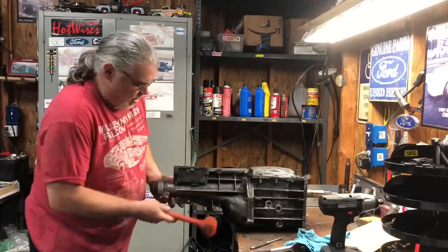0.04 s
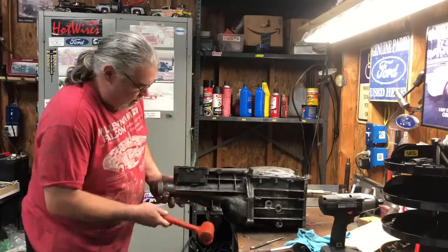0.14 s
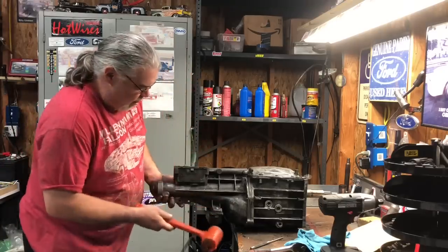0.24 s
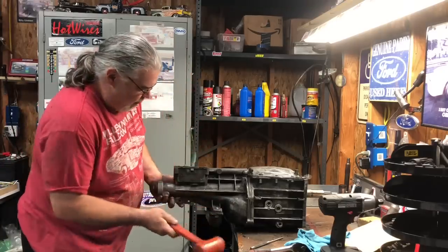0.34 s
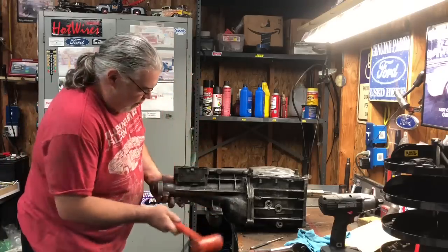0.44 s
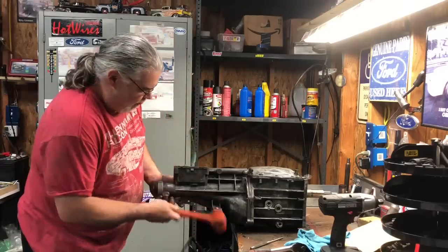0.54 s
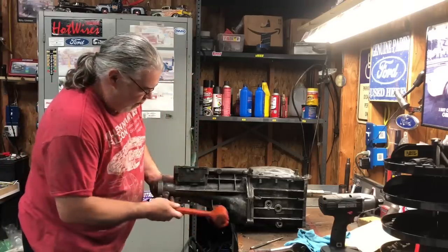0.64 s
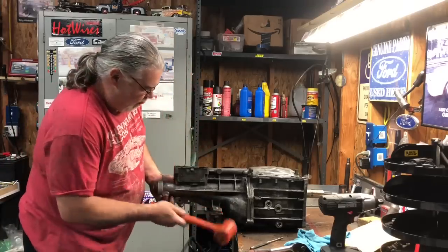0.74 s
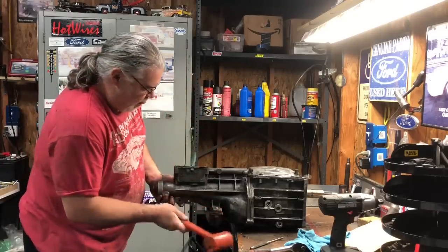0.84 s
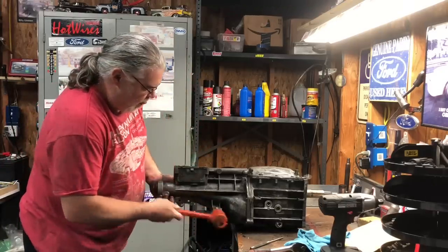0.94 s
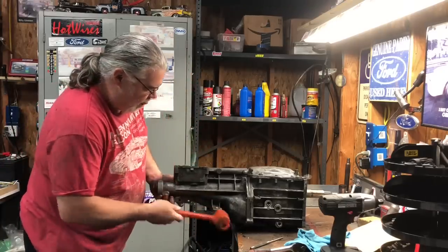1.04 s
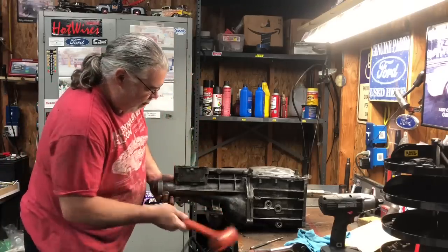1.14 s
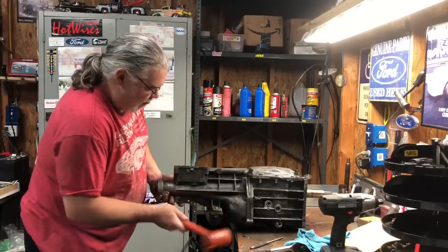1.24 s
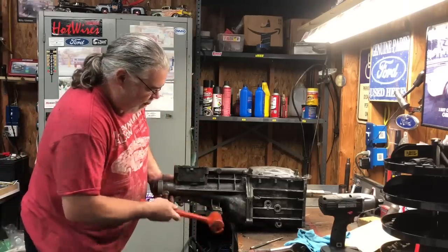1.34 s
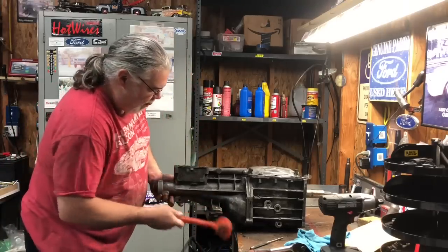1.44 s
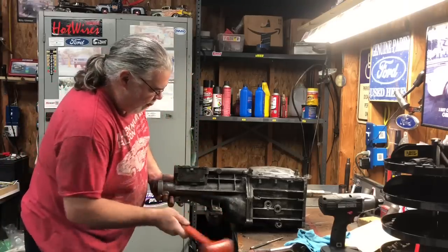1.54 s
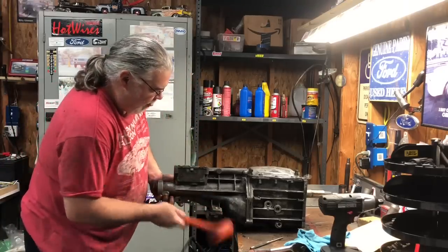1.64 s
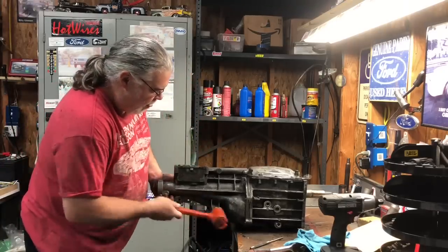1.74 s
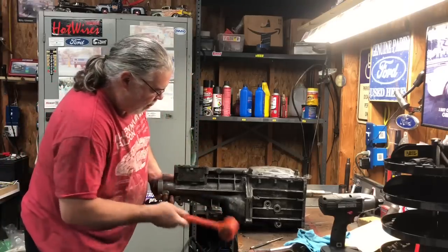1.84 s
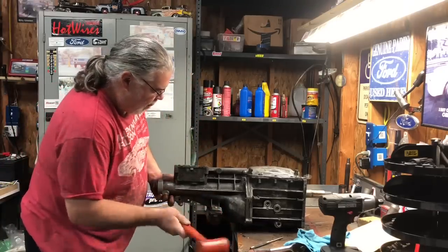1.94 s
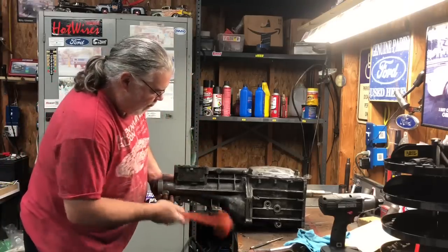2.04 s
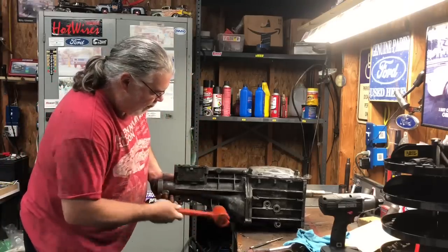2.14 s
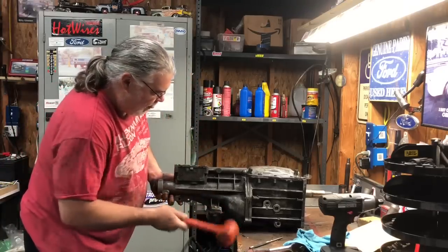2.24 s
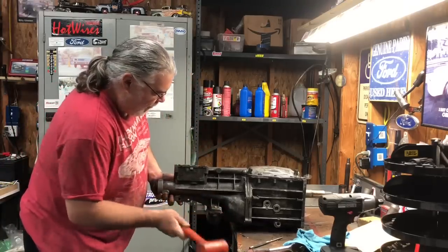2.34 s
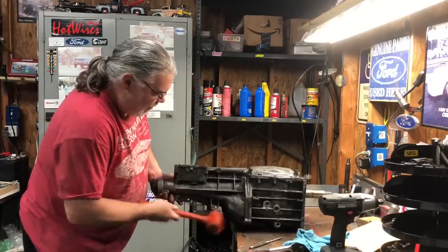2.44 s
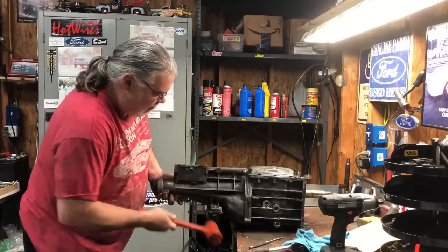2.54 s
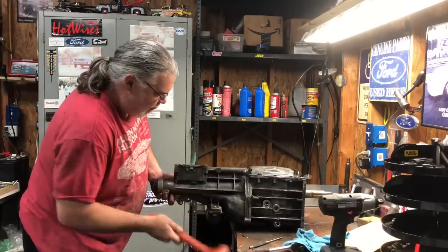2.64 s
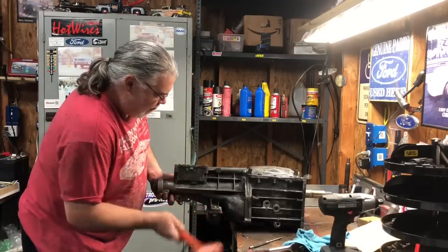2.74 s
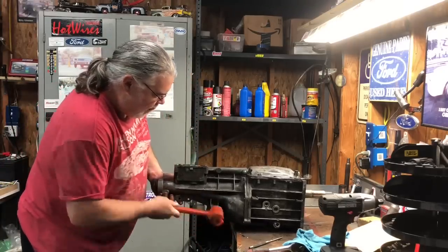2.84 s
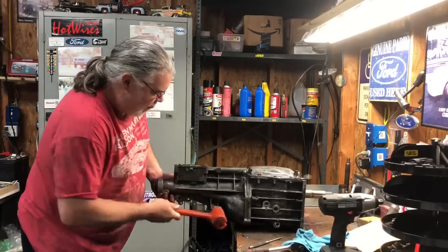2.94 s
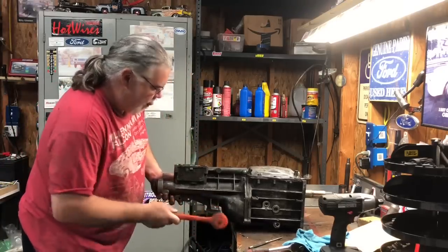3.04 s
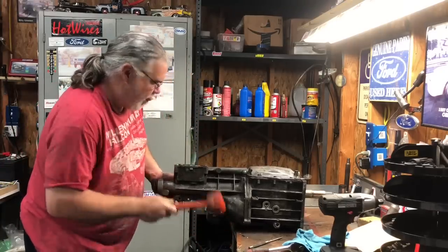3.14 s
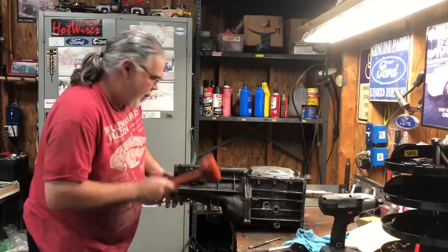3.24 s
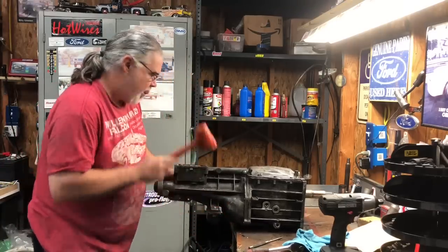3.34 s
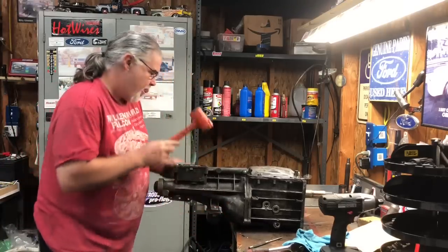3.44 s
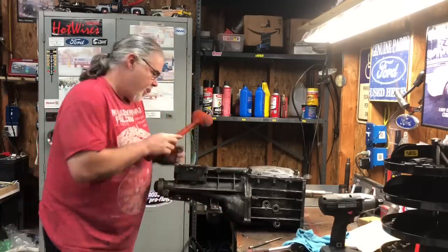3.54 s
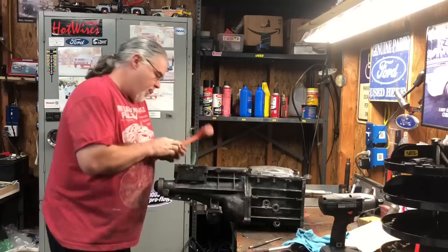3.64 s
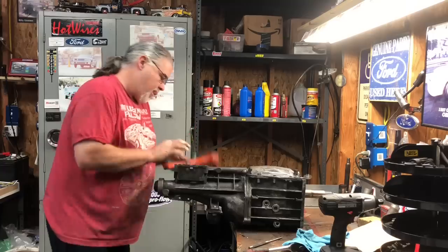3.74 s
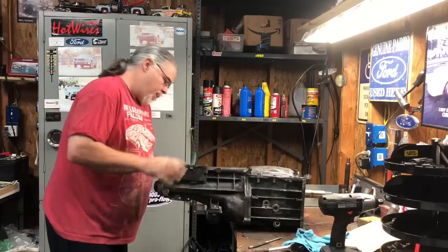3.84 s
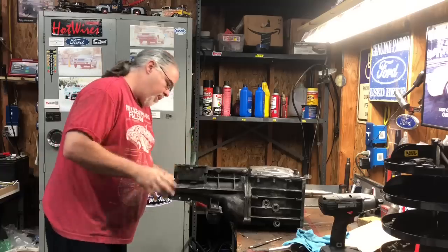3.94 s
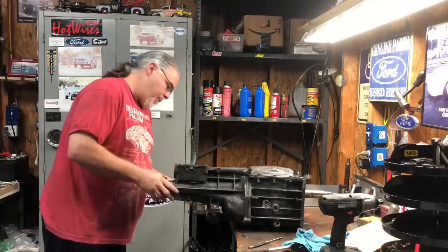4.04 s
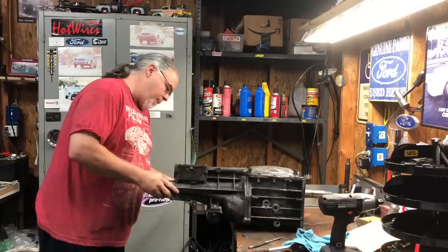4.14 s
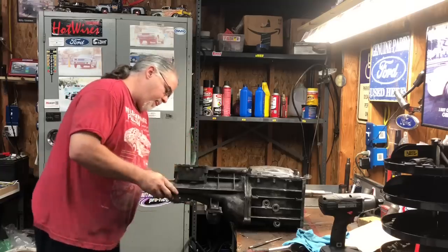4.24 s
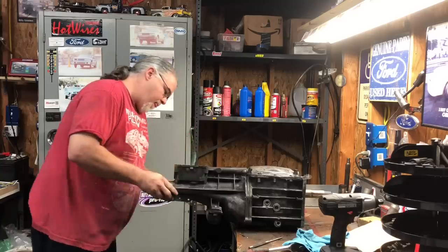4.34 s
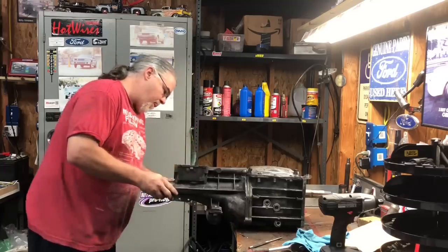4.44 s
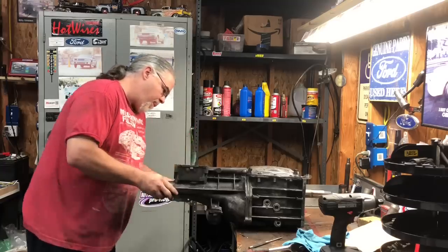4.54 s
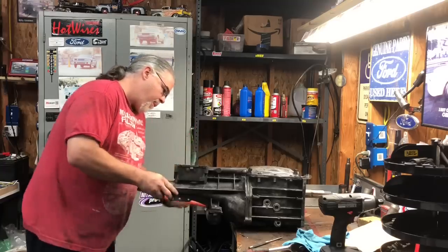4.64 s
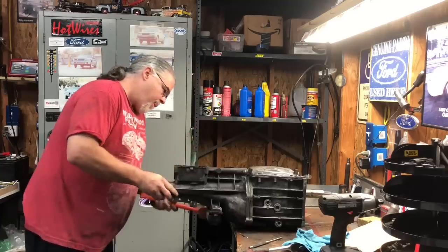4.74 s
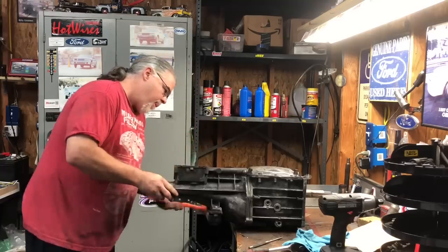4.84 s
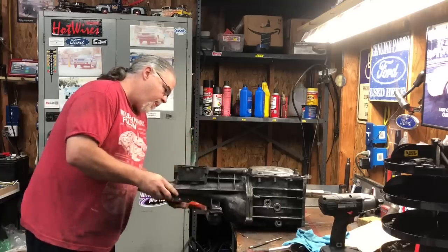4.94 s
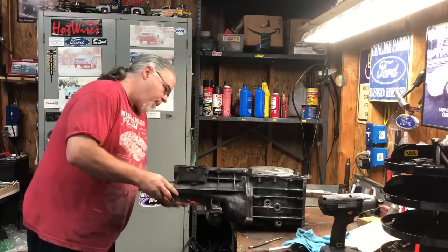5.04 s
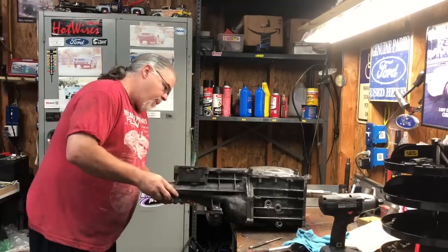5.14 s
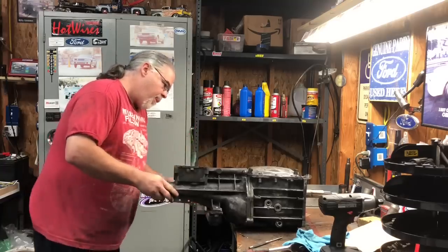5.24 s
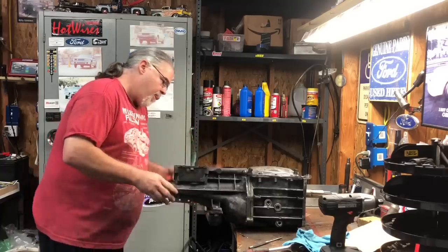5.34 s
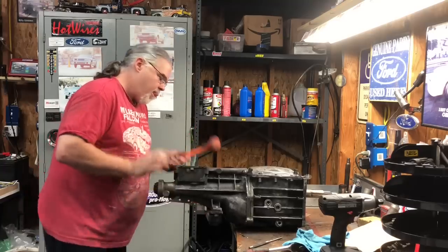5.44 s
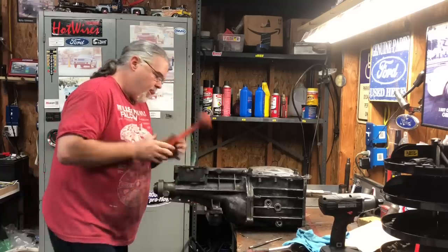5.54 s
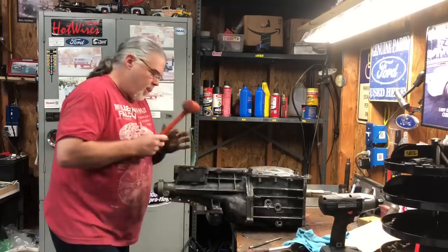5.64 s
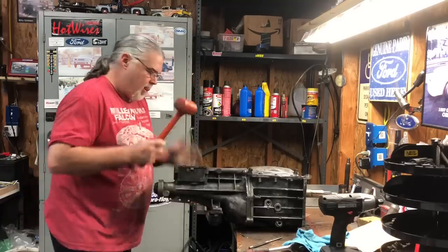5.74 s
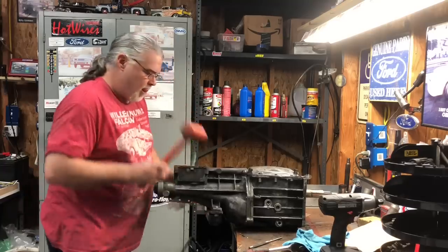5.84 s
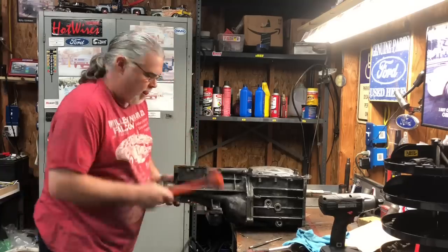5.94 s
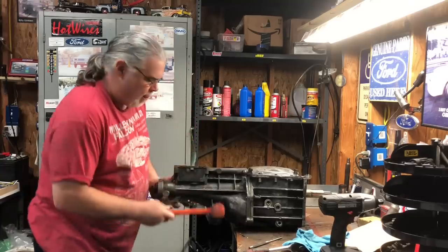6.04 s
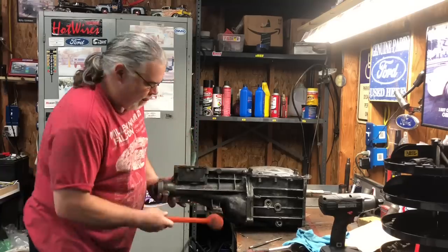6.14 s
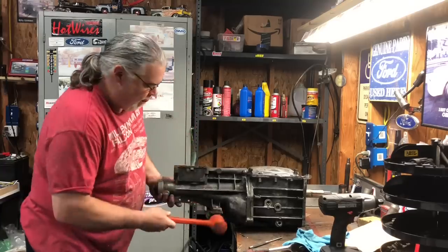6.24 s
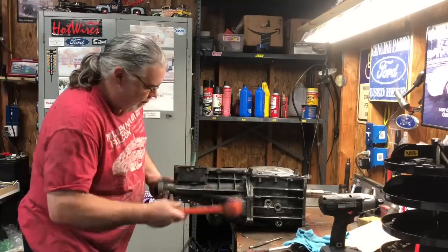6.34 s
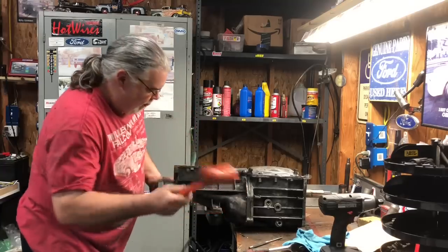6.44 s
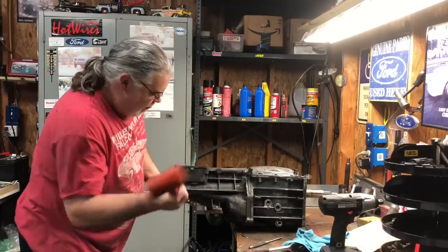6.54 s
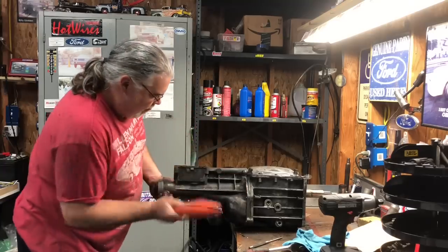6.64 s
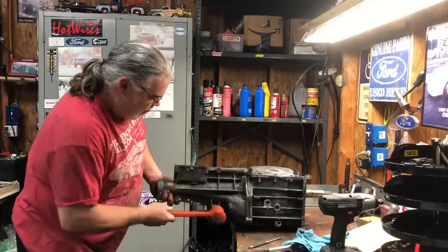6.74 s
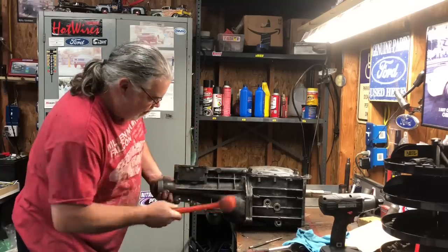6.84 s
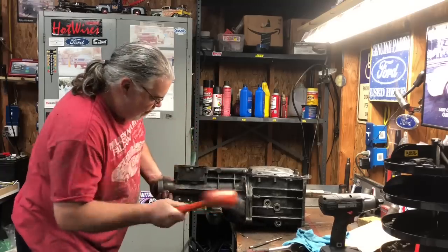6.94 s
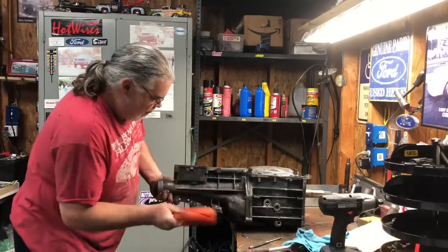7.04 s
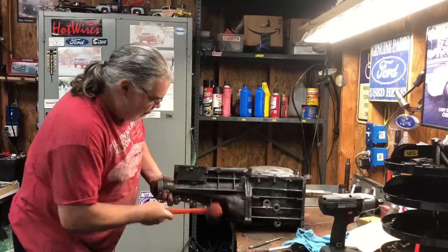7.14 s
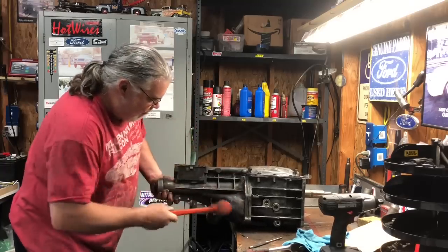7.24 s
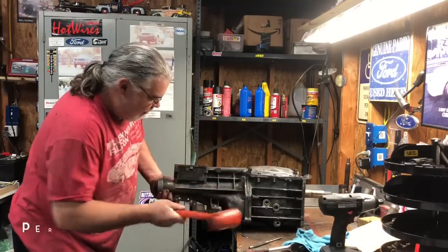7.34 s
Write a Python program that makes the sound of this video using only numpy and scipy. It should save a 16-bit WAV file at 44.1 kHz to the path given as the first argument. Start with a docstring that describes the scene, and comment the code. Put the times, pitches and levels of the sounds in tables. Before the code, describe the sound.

A quiet workshop room tone opens with the soft slide of shot inside a mallet head. From about 0.6 to 2.9 seconds the plastic mallet strikes a cast metal housing seven times, evenly, a little under three blows a second, growing louder over the first few. Each is a sharp crack and thump with a brief metallic ring, a low shudder from the wooden bench and a short room echo. The shot hisses faintly on each backswing. A pause follows with soft pouring, tiny bright ticks and a light tap near 3.8 seconds. Three duller knocks land at about 4.4, 4.8 and 5.1 seconds. From 5.4 to 6.7 seconds there is more faint sliding shot and ticking, with dull handling taps around 5.9 and 6.3 seconds. Two last sharp, slightly higher blows come at 6.8 and 7.2 seconds.

```python
"""A shot-filled plastic mallet strikes a cast metal housing on a wooden bench in a small workshop.
Each blow is a crack of the face, a dull thump of the head and the shot slamming forward inside it.
The casting rings, the bench throbs and shudders, and the room answers. Between blows the shot slides
and pours in the head, with light handling taps and small bright ticks, over a quiet room tone."""
import sys
import numpy as np
from scipy import signal
from scipy.fft import rfft, irfft
from scipy.io import wavfile

SR = 44100
rng = np.random.default_rng(int(sys.argv[2]) if len(sys.argv) > 2 else 0)


def wav_record(signal):
    """Record a signal, one row per channel, as 16-bit PCM in the file named by sys.argv[1]."""
    frames = np.transpose(np.atleast_2d(signal))
    bounded = np.clip(frames, -1, 1)
    # unit amplitude maps onto the largest positive 16-bit level
    quanta = np.round(bounded * 32767).astype(np.int16)
    wavfile.write(sys.argv[1], SR, quanta)


N = 326307
AFTER = np.arange(SR // 2) / SR   # seconds since a blow

# The mallet blows. Each row: start in seconds, thump level in dB, thump pitch in Hz,
# then the relative levels in dB of clack, crack, shot slam and bench ring.
BLOWS = [(0.6497, -12, 690, -24.5, -14, -23.5, -31.5), (1.027, -7.5, 740, -15.5, -9.5, -18, -29.5),
         (1.4037, -6, 800, -12, -8, -15.5, -28), (1.7747, -3, 814, -9.5, -6.5, -16, -30),
         (2.156, -5.5, 754, -12, -8.5, -14, -30.5), (2.53, -6.5, 827, -21, -8, -14, -28.5),
         (2.9156, -4.5, 824, -10.5, -5.5, -13, -34), (4.3691, -7.5, 588, -15, -31.5, -17.5, -34.5),
         (4.7601, -6, 804, -10, -34.5, -16.5, -34.5), (5.1433, -8, 720, -23, -23, -17, -38.5),
         (6.7970, -3.5, 1065, -20, -10, -11.5, -27.5), (7.2154, -4.5, 985, -20, -17, -12, -27)]


def from_db(db):
    """Decibels to gain."""
    return 10 ** (np.asarray(db) / 20)


def rms_one(x):
    """Scales a signal to rms 1."""
    return x / np.sqrt(np.mean(x ** 2) + 1e-20)


def filtered(x, kind, hz, order=2):
    """Butterworth low, high or band pass."""
    return signal.sosfilt(signal.butter(order, hz, kind, fs=SR, output="sos"), x)


def at_hz(points, hz):
    """Reads a curve on a log-frequency axis."""
    point_hz, values = np.transpose(points)
    return np.interp(np.log(hz), np.log(point_hz), values)


def coloured(spectrum, white):
    """Gives white noise a tone colour, keeping its power."""
    gain = from_db(at_hz(spectrum, np.linspace(1, SR / 2, len(white) // 2 + 1)))
    return irfft(rfft(white) * rms_one(gain), len(white))


def add(out, start, wave):
    """Mixes a wave in at a start in seconds."""
    i = round(start * SR)
    out[i:i + len(wave)] += wave[:N - i]


def clicks_at(times, levels_db):
    """Single-sample impulses."""
    out = np.zeros(N)
    out[np.round(np.asarray(times) * SR).astype(int)] = from_db(levels_db)
    return out


def ring(clicks, hz, t60):
    """One mode: a unit click starts a dying sine of height 1."""
    decay, step = from_db(-60 / (t60 * SR)), 2 * np.pi * hz / SR
    return signal.lfilter([0, np.sin(step)], [1, -2 * decay * np.cos(step), decay ** 2], clicks + 1e-18)


def pellets(per_s, spread_db):
    """Tiny random collisions, uneven in size by spread_db; rms 1."""
    sizes = from_db(spread_db * np.minimum(rng.exponential(1, N), 4)) * rng.choice([-1, 1], N)
    return rms_one(sizes * (rng.random(N) < per_s / SR))


def envelope(rise, t60):
    """Swells over the rise time, then dies away."""
    return (1 - np.exp(-AFTER / rise)) * from_db(-60 * np.maximum(AFTER - 2 * rise, 0) / t60)


def surge(start, swell, hold, fade_db_per_s, shape):
    """Swells to 1, holds, then fades evenly in dB; a lower shape starts more abruptly."""
    t = np.arange(N) / SR - start
    attack = np.sin(np.pi / 2 * np.clip(t / swell, 0, 1)) ** shape
    return attack * from_db(-fade_db_per_s * np.maximum(t - swell - hold, 0))


def spot(time):
    """The character of the spot being struck at this time."""
    # Near flank, far flank, tail end. Each row: start in seconds, body level against the thump in dB,
    # slam rise and t60 in seconds, slam bass and treble boosts in dB, bench shudder in dB.
    spots = [(0, -11, 0.0016, 0.13, 3.5, -4, -35), (4, -8, .0022, 0.11, 1.5, 15, -28.5),
             (6, -21, .015, 0.2, 2.5, 11.5, -32.5)]
    return [row[1:] for row in spots if row[0] <= time][-1]


def room_tone():
    """Low rumble and faint hiss with one mains overtone."""
    # The colour of the quiet room. Each row: frequency in Hz, relative level in dB.
    colour = [(15, -40.5), (25, -0.5), (80, 1.5), (238, -8), (349, -13), (831, -11), (1430, -20.5),
              (3810, -29.5), (4860, -27), (8600, -36), (11900, -37.5), (15200, -38), (16500, -57)]
    hum = np.sqrt(2) * np.sin(2 * np.pi * 240 * np.arange(N) / SR)
    return from_db(-53.5) * coloured(colour, rng.standard_normal(N)) + from_db(-68) * hum


def sliding_shot():
    """Pellets ticking on each other hiss; when the whole load pours, the wall of the head rumbles."""
    # The shot shifts on a back swing or a turn of the wrist.
    # Each row: start and swell in seconds, hiss in dB, fade in dB per second.
    shakes = [(0.433, 0.094, -55, 260), (.85, .11, -46.5, 331.5), (1.215, 0.11, -44.5, 300.5),
              (1.585, 0.11, -43, 300), (1.973, 0.086, -42.5, 297), (2.345, 0.12, -44, 323),
              (2.72, 0.12, -46, 297), (3.11, 0.058, -52, 220), (3.391, 0.072, -61.5, 150),
              (3.76, 0.042, -55, 90.5), (3.95, 0.053, -61.5, 152), (4.06, 0.032, -69, 174),
              (4.2, .06, -61, 239), (4.56, 0.13, -50, 300), (4.961, 0.1, -47.5, 323),
              (5.365, 0.056, -53, 189), (5.594, 0.18, -57.5, 64), (5.9, 0.052, -58, 80),
              (6.03, 0.1, -57, 170), (6.525, 0.021, -52.5, 58), (6.63, 0.15, -60.5, 260),
              (6.985, 0.15, -48.5, 206)]
    # The load pours along the head. Each row: start, swell and hold in seconds, hiss and rumble in dB.
    pours = [(-.04, .1, 0.15, -49, -40.5), (3.443, .015, .01, -69, -57.5), (3.816, 0.025, 0.03, -69, -54),
             (4.045, 0.039, 0.015, -70.5, -56.5), (5.709, 0.072, 0.089, -76, -50),
             (6.163, 0.23, .04, -46.5, -42.5)]
    # The colours of pellets and wall. Each row: frequency in Hz, relative level in dB.
    hiss_colour = [(880, -43), (1500, -12.5), (1910, -3.5), (2630, -11.5), (2880, -4.5), (3120, -9),
                   (3350, -3.5), (4800, -4), (5810, 2.5), (7030, -0.5), (8510, -6.5), (11700, -0.5),
                   (14900, -4), (16000, -22.5), (16500, -22.5)]
    rumble_colour = [(180, -20), (300, -17), (447, -8), (767, -2), (824, -5), (923, -3), (1680, -6),
                     (2470, -4), (9000, -17), (11700, -38), (19800, -120)]
    hiss_gain, rumble_gain = np.zeros((2, N))
    for start, swell, hiss_db, fade in shakes:
        hiss_gain += from_db(hiss_db) * surge(start, swell, 0, fade, shape=0.81)
    for start, swell, hold, hiss_db, rumble_db in pours:
        flow = surge(start, swell, hold, fade_db_per_s=187, shape=1.22)
        hiss_gain += from_db(hiss_db) * flow
        rumble_gain += from_db(rumble_db) * flow
    clumps_per_s, clump_db = 26, 2.5   # the shot moves in clumps
    clumps = np.interp(np.arange(N) / SR * clumps_per_s, np.arange(600), rng.standard_normal(600))
    hiss = coloured(hiss_colour, pellets(4400, spread_db=0))
    rumble = coloured(rumble_colour, pellets(5000, spread_db=-1.5))
    return from_db(clump_db * clumps) * hiss_gain * hiss + rumble_gain * rumble


def falling_wave(hz, peak_s, glide, fade):
    """Bending waves spread out, highs first: a short wave train falls through hz near its peak."""
    t = AFTER / peak_s
    cycles = hz * peak_s * t ** (1 - glide) / (1 - glide)
    return t ** 1.09 * np.exp(1.5 / fade * (1 - t ** fade)) * np.sin(2 * np.pi * cycles)


def thumps():
    """The head thumps and the whole body of the housing gives, with a short, bright clack."""
    body = falling_wave(hz=393.8, peak_s=0.00441, glide=0.4194, fade=3.0)
    clack = falling_wave(hz=2344, peak_s=0.00094, glide=0.15, fade=0.77)
    out = np.zeros(N)
    for start, thump_db, hz, clack_db, *_ in BLOWS:
        body_db = spot(start)[0]
        head = falling_wave(hz, peak_s=1.656 / hz, glide=0.5752, fade=1.5)
        add(out, start, from_db(thump_db) * (head + from_db(body_db) * body) + from_db(clack_db) * clack)
    return out


def cracks():
    """The plastic face meets the metal in a snap of bright noise."""
    gain = np.zeros(N)
    for start, *_, crack_db, _, _ in BLOWS:
        add(gain, start, from_db(crack_db + 5.5) * envelope(rise=0.00021, t60=0.0067))
    return gain * rms_one(filtered(rng.standard_normal(N), "band", [5200, 10400]))


def shot_slam():
    """The shot lands just after the face in a dense burst, its bass and treble set by the spot struck."""
    # The colour of the landing shot. Each row: frequency in Hz, relative level in dB.
    colour = [(88, -33), (150, 13), (442, 0), (847, 11), (1310, 0.5), (1410, 4), (1970, 7), (2310, 1),
              (2500, 5.5), (3040, -2), (5820, 1), (7810, -4), (11100, -21), (15000, -19.5), (16500, -61)]
    grains = coloured(colour, pellets(9000, spread_db=-0.5))
    grains = filtered(grains, "high", 260)   # the head is too small for deep bass
    bass, treble = filtered(grains, "low", 1500), filtered(grains, "band", [10000, 14500])
    gain, bass_gain, treble_gain = np.zeros((3, N))
    for start, *_, slam_db, _ in BLOWS:
        _, rise, t60, bass_db, treble_db, _ = spot(start)
        landing = from_db(slam_db) * envelope(rise, t60)
        add(gain, start + 0.00023, landing)
        add(bass_gain, start + 0.00086, landing * (from_db(bass_db) - 1))
        add(treble_gain, start + 0.0026, landing * (from_db(treble_db) - 1))
    return gain * grains + bass_gain * bass + treble_gain * treble


def casting():
    """The housing rings in a new balance each blow: main modes follow the thump, higher ones the clack."""
    # The housing's modes. Each row: pitch in Hz, relative level in dB, t60 in seconds.
    main_modes = [(345, -3, 0.33), (408, -5, 0.24), (534, -3.5, 0.29), (748, -12.5, 0.2), (760, 1, 0.067),
                  (870, -13, 0.68), (900, -20.5, .14), (940, -14.5, 0.074), (1123, -7.5, 0.41),
                  (1094, -40.5, .14), (1140, -6.5, .14), (1420, -21.5, .14), (6560, -36.5, .12)]
    higher_modes = [(1410, -24.5, .12), (1630, -23, .1), (2000, -22.5, .1), (2227, -25, .1),
                    (2470, -25, .1), (2700, -25.5, .18)]
    starts, thump_db, _, clack_db, *_ = np.transpose(BLOWS)
    scatter_db = rng.normal(0, 3, (len(starts), len(main_modes) + len(higher_modes)))
    out = np.zeros(N)
    for k, (hz, mode_db, t60) in enumerate(main_modes):
        out += ring(clicks_at(starts + 0.0028, thump_db + mode_db - 24 + scatter_db[:, k]), hz, t60)
    for k, (hz, mode_db, t60) in enumerate(higher_modes):
        out += ring(clicks_at(starts + 0.001, clack_db + mode_db + scatter_db[:, -1 - k]), hz, t60)
    return out


def workshop(x):
    """Reflections too dense to tell apart: each band stores energy, which leaks away as noise."""
    # The room's decay. Each row: frequency in Hz, t60 in seconds.
    decay_times = [(60, 1), (150, 0.87), (400, 0.27), (1000, 0.38), (2500, 0.38), (6000, 0.35),
                   (15000, 0.11)]
    edges_hz = 63 * 2 ** np.arange(0, 8.2, 1 / 3)
    white, out = rng.standard_normal((2, N)), np.zeros(N)
    for k, band in enumerate(zip(edges_hz, edges_hz[1:])):
        hz = np.sqrt(band[0] * band[1])
        leak = from_db(-120 / (at_hz(decay_times, hz) * SR))
        fill = np.exp(-1 / ((0.00067 + 1.8 / hz) * SR))   # the bass fills slowly
        power = filtered(x, "band", band) ** 2
        stored = signal.lfilter([(1 - leak) * (1 - fill)], np.convolve([1, -leak], [1, -fill]), power)
        tail = np.sqrt(np.abs(stored)) * rms_one(filtered(white[k % 2], "band", band))
        add(out, 0.0037, tail)   # delayed by the trip to the first wall
    return out


def bench():
    """The bench takes up each push slowly: two close modes throb, a higher one rings, boards shudder."""
    low_hz, beat_hz, rise_s = 98.8, 10.5, 0.017
    starts, *_, ring_db = np.transpose(BLOWS)
    push = clicks_at(starts + 0.01, ring_db + 5)
    modes = from_db(-5) * ring(push, hz=178.5, t60=0.28)
    for hz, mode_db in ((low_hz, 0), (low_hz - beat_hz, -8)):
        modes += from_db(mode_db) * (ring(push, hz, t60=0.4) - ring(push, hz, t60=rise_s * np.log(1000)))
    shudder = np.zeros(N)
    for start in starts:
        shudder_db = spot(start)[-1]
        add(shudder, start + 0.0054, from_db(shudder_db) * envelope(rise=0.016, t60=0.28))
    return modes + shudder * rms_one(filtered(rng.standard_normal(N), "band", [72.5, 240]))


def echoes(x):
    """The nearest hard surfaces each return one duller copy."""
    # Bench top, cabinet and walls. Each row: delay in seconds, level in dB.
    surfaces = [(.011, -17.5), (0.0181, -25), (.024, -23), (.033, -23)]
    out, dull = np.zeros(N), filtered(x, "low", 5000, order=1)
    for delay, level_db in surfaces:
        add(out, delay, from_db(level_db) * dull)
    return out


def bright_ticks():
    """Bright ticks of four quick touches each: a loose metal part or, once, the shot starting to shift."""
    # The ticks. Each row: start in seconds, level in dB.
    ticks = [(3.138, -45), (3.146, -48), (3.16, -60), (3.193, -61), (3.41, -59), (3.426, -60), (3.437, -56),
             (3.81, -49), (5.388, -48), (5.608, -61), (5.777, -50), (5.901, -53), (5.951, -57),
             (6.044, -53), (6.086, -52), (6.534, -61), (6.605, -58.5), (6.653, -52), (6.735, -58),
             (7.04, -53), (7.12, -40)]
    # Their high ring. Each row: pitch in Hz, relative level in dB, t60 in seconds.
    modes = [(11800, -9, 0.024), (11880, -4.5, 0.027), (12900, -17, 0.027), (13300, -21, 0.027),
             (14200, -13, 0.036)]
    starts, level_db = np.transpose(ticks)
    lag_s = np.hstack([np.zeros((len(starts), 1)), rng.uniform(0.0018, 0.04, (len(starts), 3))])
    scatter_db = rng.normal(0, 5, (len(starts), 4, len(modes)))
    touch_db = level_db[:, None] - 250 * lag_s   # later touches are weaker
    return sum(ring(clicks_at(starts[:, None] + lag_s, touch_db + mode_db + scatter_db[..., k]), hz, t60)
               for k, (hz, mode_db, t60) in enumerate(modes))


def taps():
    """Handle, hands and feet make light, dull taps, each one quickly damped mode."""
    # The taps. Each row: start in seconds, level in dB, pitch in Hz, t60 in seconds.
    touches = [(3.45, -60, 1500, .015), (3.751, -40, 900, 0.022), (3.751, -41, 1350, .012),
               (3.7525, -45, 3000, .008), (5.839, -46, 106.4, .05), (5.857, -37, 130, 0.048),
               (5.884, -33.5, 224, 0.023), (5.9, -42, 250, 0.035), (5.901, -37, 540, 0.043),
               (5.924, -44, 150, .04), (6.261, -38.5, 195, 0.056), (6.304, -49, 130, .04)]
    return sum(ring(clicks_at([start], level_db), hz, t60) for start, level_db, hz, t60 in touches)


def scene():
    """Everything at one microphone; only the impacts feed the room."""
    impacts = thumps() + shot_slam() + cracks() + bright_ticks() + taps()
    room = echoes(impacts) + from_db(-7) * workshop(impacts)
    return (impacts + room + casting() + bench() + sliding_shot() + room_tone())[None]


def record(dry):
    """The microphone drops the deepest bass, peaks near full scale are rounded, the top is cut."""
    low_cut_hz, ceiling, top_cut_hz = 58, 0.95, 16400
    thin = filtered(dry, "high", low_cut_hz, order=3)
    rounded = thin / (1 + (thin / ceiling) ** 4) ** (1 / 4)
    return signal.sosfilt(signal.cheby2(20, 70, top_cut_hz, fs=SR, output="sos"), rounded)


dry = scene()
out = record(dry)
wav_record(out)
```